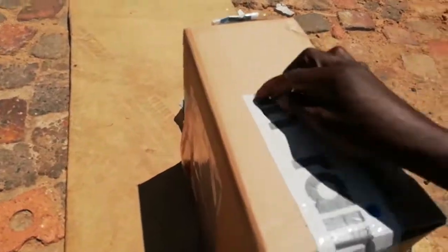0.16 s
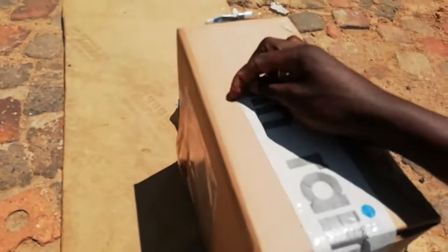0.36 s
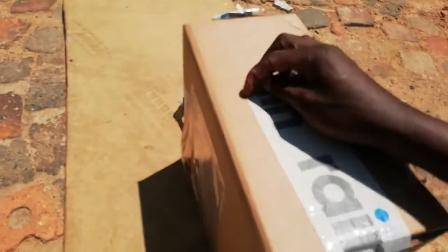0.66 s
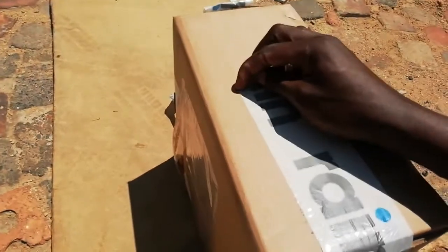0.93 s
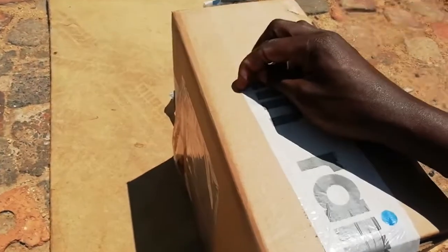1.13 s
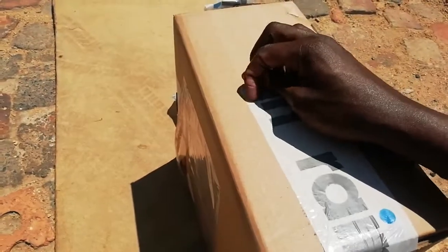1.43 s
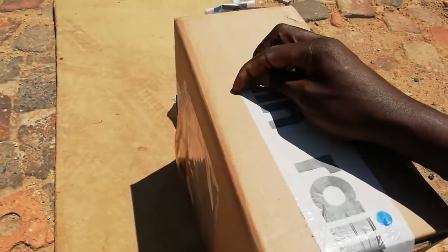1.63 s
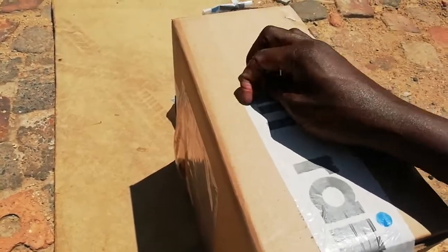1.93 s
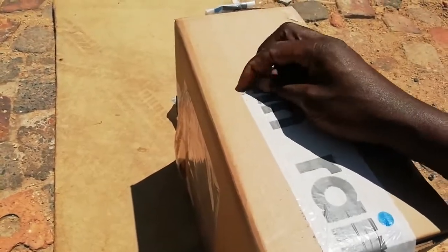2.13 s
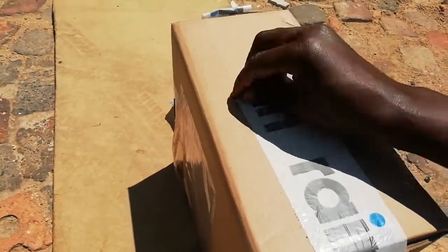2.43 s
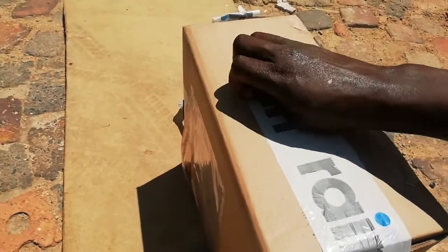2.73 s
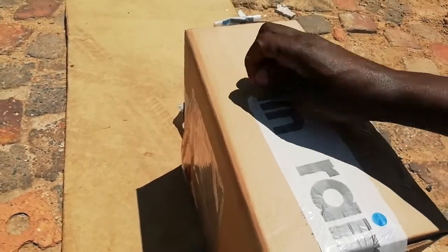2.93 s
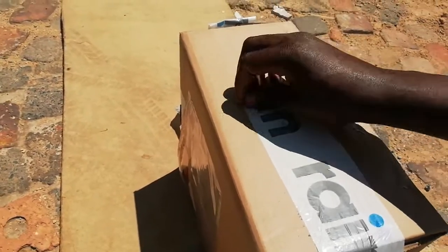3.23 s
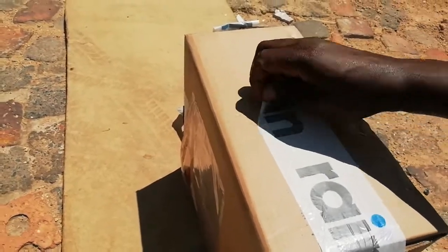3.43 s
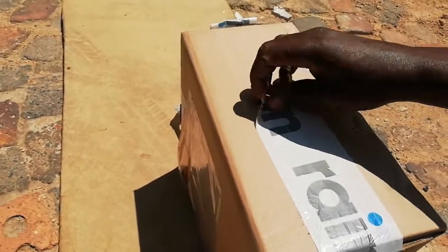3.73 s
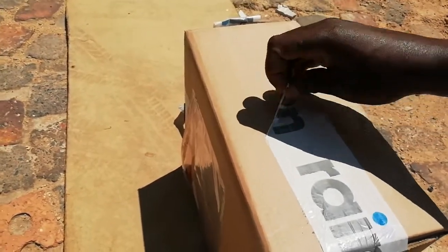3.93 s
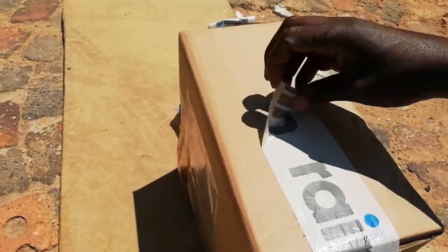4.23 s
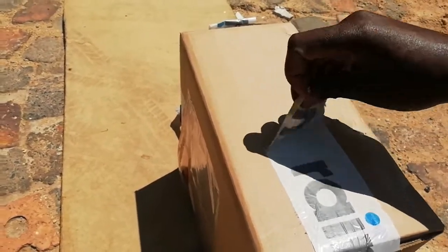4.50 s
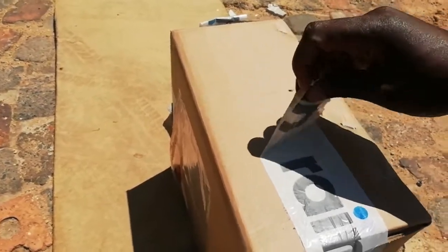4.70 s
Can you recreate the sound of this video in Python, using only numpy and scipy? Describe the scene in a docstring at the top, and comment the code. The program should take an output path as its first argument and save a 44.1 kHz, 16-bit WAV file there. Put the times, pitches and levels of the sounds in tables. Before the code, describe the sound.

Fingernails pick and flick at sealing tape on a cardboard box, then peel it in growing harsh rasps, with low hum and wind buffeting outdoors.

```python
"""Tape peeled off a box outdoors

Fingernails pick at sealing tape on a cardboard box, then peel it in short rasps, close to a phone.
Glue slips, snaps and nail flicks are noise bursts through the colours of tape film and box wall.
An engine hums (wavering sine) and a far horn toots once with an echo (overtones).
Light wind buffets the microphone ports (low noise and puffs) over a faint yard (noise)."""
import sys
import numpy as np
from scipy import signal
from scipy.fft import rfft, irfft, next_fast_len
from scipy.io import wavfile
from scipy.ndimage import uniform_filter1d, map_coordinates

SR = 44100
rng = np.random.default_rng(int(sys.argv[2]) if len(sys.argv) > 2 else 0)


def wrap_up_sound(samples):
    """Save the sound to the file named by the first command line argument, as 16-bit audio."""
    columns = np.atleast_2d(samples).T
    # keep every value between -1 and 1, then stretch to whole-number steps
    tamed = np.clip(columns, -1, 1)
    steps = np.round(tamed * 32767).astype(np.int16)
    wavfile.write(sys.argv[1], SR, steps)


N = 214326

# Colour of the tape film: (frequency [Hz], relative density [dB])
FILM_COLOUR = [(1290, -53), (2200, -22), (2950, -10.5), (3860, -8.5), (4530, -7.5), (4880, -8.5), (8640, 4),
               (10800, -9), (14400, -18.5), (15600, -26), (16400, -71)]
# Colour of the box wall: (frequency [Hz], relative density [dB])
WALL_COLOUR = [(94, -18), (160, -15), (235, -0.5), (358, -9.5), (393, -11.5), (564, -13.5), (1010, -5),
               (1730, -4), (2060, -6), (2600, -11), (3380, -7), (5720, -120)]
# Near sounds at the two ports: (frequency [Hz], left-right likeness [-1 to 1])
NEAR_ALIKE = [(60, 0.6), (180, 1), (550, 0.46), (1650, 0.62), (4970, 0.015), (15000, 0.018)]
# Near sounds at the two ports: (frequency [Hz], left over right [dB])
NEAR_LEAN = [(60, 2), (150, 4), (380, -4), (950, 3.5), (2380, -2.5), (5980, -0.5), (15000, 9.5)]


def amp(db):
    """Gain of a level in dB."""
    return 10 ** (np.asarray(db) / 20)


def unit(x):
    """x at rms 1."""
    return x / np.sqrt(np.mean(x ** 2) + 1e-20)


def along(points, hz):
    """(Hz, value) points interpolated on a log axis."""
    f, v = np.transpose(points)
    return np.interp(np.log(hz + 1), np.log(f + 1), v)


def curves(rows):
    """One value per sample for each column after the time."""
    s, *cols = np.transpose(rows)
    return [np.interp(np.arange(N) / SR, s, c) for c in cols]


def wobble(knots_per_s):
    """A smooth random curve through normal random knots."""
    knots = rng.standard_normal(int(N * knots_per_s / SR) + 4)
    return map_coordinates(knots, [np.arange(N) * knots_per_s / SR])


def held(start_s, length_s, rise_db_per_s, fall_db_per_s):
    """Attack, hold and release in dB under full level."""
    t = np.arange(N) / SR
    rise_db = -rise_db_per_s * np.maximum(start_s - t, 0)
    fall_db = -fall_db_per_s * np.maximum(t - start_s - length_s, 0)
    return rise_db + fall_db


def coloured(pair, spectrum, alike, lean=((100, 0), (1000, 0))):
    """Two unrelated drives through a causal colour of mean power gain 1, mixed to left and right."""
    # Part of the port difference that is only a phase shift: (frequency [Hz], share [0-1])
    shifted = [(300, 0.7), (1500, 0), (5000, 0.33)]
    m = 2 * next_fast_len(N // 2 + 4096)
    hz = np.fft.rfftfreq(m, 1 / SR)
    gain = unit(amp(np.maximum(along(spectrum, hz), -80)))

    # minimum phase: fold the cepstrum onto positive time
    cepstrum = irfft(np.log(gain), m)
    cepstrum[1:m // 2] *= 2
    cepstrum[m // 2 + 1:] = 0
    a, b = rfft(pair, m) * np.exp(rfft(cepstrum))

    turn = np.arccos(np.clip(along(alike, hz), -1, 1)) / 2
    share = np.clip(along(shifted, hz), 0, 1)
    mid = a * np.cos(turn)
    side = (1j * share * a + np.sqrt(1 - share ** 2) * b) * np.sin(turn)
    tilt = amp(along(lean, hz) / 2)
    return irfft(np.array([(mid + side) * tilt, (mid - side) / tilt]), m)[:, :N]


def bursts(times_s, levels_db, shapes):
    """Two unrelated noise drives under one short shape per event, each with the energy of its shape."""
    drive = np.zeros((2, N + SR))
    for s, db, shape in zip(times_s, levels_db, shapes):
        burst = shape * rng.standard_normal((2, len(shape)))
        burst *= np.linalg.norm(shape) / np.linalg.norm(burst, axis=1, keepdims=True)
        drive[:, round(s * SR):][:, :len(shape)] += amp(db) * burst
    return drive[:, :N]


def panned(pair, times_s, pan_db):
    """Each event leans to its own side; the lean glides between events."""
    return pair * amp(np.interp(np.arange(N) / SR, times_s, pan_db) * [[.5], [-.5]])


def rubbing():
    """Slips shake the film, which hisses, and the box wall, which answers lower."""
    film, wall = np.sqrt(contact())
    grain = slips(per_s=2200, spread_db=2.6, life_s=.0002, steady=1.4) * amp(1.1 * wobble(90))
    shake = bending(grain * rng.standard_normal((2, N)), patchy_db=2.4)
    knock = bending(grain * rng.standard_normal((2, N)), patchy_db=2.3, flap_db=7)
    hiss = coloured(amp(0.07) * film * shake, FILM_COLOUR, NEAR_ALIKE, NEAR_LEAN)
    answer = coloured(amp(-5.5) * wall * knock, WALL_COLOUR, NEAR_ALIKE, NEAR_LEAN)
    return hiss + answer


def contact():
    """Power that fingertip rubs and tape pulls put into film and box wall, before their trims."""
    # Fingertip on tape or box: (start [s], length [s], film level [dB], wall over film [dB])
    rubs = [(0, 0.21, -43.5, -6), (0.226, 0.073, -47.5, 0.5), (0.325, 0.0039, -33, -0.5),
            (0.342, 0.045, -52, 0), (0.465, 0.071, -56, 0.5), (0.632, 0.0032, -45, 4),
            (0.804, 0.015, -45, -1), (1.291, 0.15, -54.5, -5.5), (1.509, 0.069, -60, -2),
            (1.585, 0.0039, -42, -8), (1.647, 0.026, -54.5, -4.5), (1.722, 0.0021, -45, 1.5),
            (1.913, 0.11, -59, -6), (2.108, .015, -55.5, -3.5), (2.19, 0.042, -55.5, -14),
            (2.249, 0.04, -48.5, -7), (2.445, 0.07, -56, -22), (2.567, 0.05, -57.5, -23),
            (2.698, 0.004, -57.5, -14), (3.166, 0.16, -62, 5), (3.207, .002, -39.5, -11),
            (3.286, 0.0093, -53, -17), (3.7, 0.022, -44.5, -7), (3.766, 0.034, -49.5, -6.5),
            (3.818, 0.0041, -35.5, -9), (4.172, 0.34, -51.5, -6.5), (4.208, 0.017, -38, -12),
            (4.685, 0.023, -49.5, -8)]
    # Pulls on the tape, one curve each: (time [s], film level [dB])
    pulls = [
        [(2.33, -56), (2.342, -49.5), (2.366, -37), (2.384, -35.5), (2.41, -40), (2.43, -58)],
        [(2.785, -62), (2.813, -40.5), (2.847, -35), (2.857, -41), (2.919, -26), (2.935, -39), (2.953, -40),
         (2.959, -46), (2.995, -63)],
        [(3.335, -48), (3.366, -33.5), (3.371, -24), (3.385, -21), (3.406, -25), (3.442, -29.5), (3.448, -25),
         (3.472, -24), (3.531, -31), (3.577, -41.5), (3.603, -42.5), (3.63, -68)],
        [(3.85, -45), (3.87, -29), (3.9, -22.5), (3.948, -18), (3.96, -22), (4.062, -19.5), (4.122, -48),
         (4.14, -53)],
        [(4.383, -31), (4.39, -29.5), (4.42, -35.5), (4.458, -22.5), (4.584, -17.5), (4.622, -23),
         (4.67, -50.5)],
        [(4.822, -43), (4.836, -25), (4.844, -33), (4.86, -19.5)],
    ]
    rise_db_per_s, fall_db_per_s = 1104, 613  # the finger speeds up and slows down
    tug_db, tug_db_per_s = -20, 3  # wall over film as the first pull starts; a longer strip tugs harder
    tension_db, tension_s = 7, 0.13  # within a pull the wall gains as the strip tightens

    t, film, wall = np.arange(N) / SR, np.zeros(N), np.zeros(N)
    for start, length, db, wall_db in rubs:
        level_db = db + held(start, length, rise_db_per_s, fall_db_per_s)
        film += amp(2 * level_db)
        wall += amp(2 * (level_db + wall_db))
    for pull in pulls:
        start, end = pull[0][0], pull[-1][0]
        level_db = curves(pull)[0] + held(start, end - start, rise_db_per_s, fall_db_per_s)
        tight = 1 - np.exp(-np.maximum(t - start, 0) / tension_s)
        wall_db = tug_db + tug_db_per_s * (start - pulls[0][0][0]) + tension_db * tight
        film += amp(2 * level_db)
        wall += amp(2 * (level_db + wall_db))
    return film, wall


def slips(per_s, spread_db, life_s, steady):
    """Loudness of glue letting go: short slips of uneven size over a steady share."""
    when = rng.random(N) < per_s / SR
    size = amp(spread_db * np.minimum(rng.exponential(size=N), 4))
    fade = np.exp(-np.arange(200) / (life_s * SR))
    return unit(steady + unit(signal.fftconvolve(when * size, fade)[:N]))


def bending(pair, patchy_db, flap_db=0):
    """Resonances shift as the tape bends: random patches of gain and the moving peak of the loose end."""
    # Resonance of the loose tape end: (time [s], frequency [Hz])
    flap = [(0, 1800), (.3, 1410), (2.3, 1680), (2.9, 1370), (3.4, 1330), (3.55, 1570), (3.8, 1450),
            (4.05, 1040), (4.3, 1350), (4.47, 1540), (4.62, 1610), (4.86, 1220)]
    hz, t, z = signal.stft(pair, SR, nperseg=256)
    field = rng.standard_normal(z.shape[1:])
    field = uniform_filter1d(field, size=3, axis=0)  # over frequency
    field = uniform_filter1d(field, size=12, axis=1)  # over time
    octaves = np.log2((hz[:, None] + 1) / np.interp(t, *np.transpose(flap)))
    gain = amp(patchy_db * unit(field) + flap_db * np.exp(-(octaves / 0.22) ** 2))
    return signal.istft(z * gain, SR, nperseg=256)[1][:, :N]


def flicks():
    """A nail skids off the tape edge for a few ms and knocks the box."""
    # Flicks: (time [s], level before trim [dB], half length [s], left over right [dB])
    nail_flicks = [(0.318, -32.5, 0.0072, 0), (0.883, -33, 0.0026, 7), (0.892, -27.5, 0.00067, 0),
                   (0.925, -27.5, 0.0017, 4.5), (1.029, -28, 0.00099, 6), (1.076, -21, 0.0019, 3.5),
                   (1.362, -16, 0.002, 1.5), (1.917, -25, 0.0028, -1.5)]
    # The box under a nail: (frequency [Hz], relative density [dB])
    nail_colour = [(90, -22), (250, 2.5), (600, -14.5), (1400, 3.5), (2200, -15), (3100, -5), (4100, -16),
                   (4800, -11.5), (6000, -17), (8100, -6.5), (9200, -14), (10200, -16.5), (13000, -29),
                   (16400, -72)]
    lead_s, peak_s = .006, .002  # the shape starts before and peaks after the listed time
    s, db, half_s, pan_db = np.transpose(nail_flicks)
    t = np.arange(SR // 20) / SR - lead_s
    skid = np.exp(-((t - peak_s) / np.maximum(half_s, 2e-4)[:, None]) ** 2)
    knock = np.exp(-np.abs(t - peak_s) / np.where(t < peak_s, .003, .008))
    drive = bursts(s - lead_s, db - 5, skid + amp(-12.5) * knock)
    return panned(coloured(drive, nail_colour, NEAR_ALIKE), s, pan_db)


def snaps():
    """A patch of glue lets go at once: a sharp tick and a short rustle in film and wall."""
    # Glue snaps: (time [s], level before trim [dB], wall over film before trims [dB])
    glue_snaps = [(1.4004, -18, -17.5), (1.6915, -27, -32), (2.4595, -31, -28), (2.5434, -29.5, -29),
                  (2.902, -14.5, -35), (2.9493, -12, -22.5), (3.021, -34.5, -27), (3.1679, -27, -12),
                  (3.1777, -29.5, -8.5), (3.3548, -15.5, -24), (3.603, -23, -28), (3.691, -26, -12.5),
                  (3.706, -17, -19), (3.8185, -28, -15), (3.931, -8, -32), (4.127, -27, -30),
                  (4.172, -21.5, -30), (4.1973, -26, -13), (4.2153, -7, -17.5), (4.228, -11, -34),
                  (4.2378, -16, -20), (4.301, -18.5, -26), (4.3139, -12.5, -20), (4.3336, -15, -15),
                  (4.3723, -14, -20), (4.3881, -1, -26.5), (4.665, -22.5, -2.5), (4.7625, -21, -37),
                  (4.816, -32, -9), (4.8347, -4, -23.5)]
    s, db, wall_db = np.transpose(glue_snaps)
    t = np.arange(SR // 20) / SR
    tick, rustle = np.exp(-t / 0.00015), amp(-16.5) * np.exp(-t / 0.0033)
    shapes = [tick + rustle] * len(s)
    film = coloured(bursts(s, db - 3.5, shapes), FILM_COLOUR, NEAR_ALIKE, NEAR_LEAN)
    wall = coloured(bursts(s, db + wall_db + 3.0, shapes), WALL_COLOUR, NEAR_ALIKE, NEAR_LEAN)
    return film + wall


def squeak():
    """A thin, grainy tone that rises as the tape is drawn tight."""
    # Faint tone, before its wobbles: (time [s], frequency [Hz], level [dB])
    tone = [(3.16, 1650, -80), (3.205, 1740, -65), (3.25, 1880, -63), (3.3, 2130, -61), (3.33, 2050, -85)]
    hz, db = curves(tone)
    phase = 2 * np.pi * np.cumsum(hz + 55 * wobble(150)) / SR
    return amp(db + 3.5 * wobble(90)) * np.sin(phase)


def engine():
    """One low, slightly unsteady order of an idling engine."""
    # Hum before its wobble: (time [s], rms level [dB])
    hum = [(0, -38.5), (.5, -38.5), (.62, -49), (.8, -62), (1.05, -51.5), (1.75, -46), (2.03, -38.5),
           (2.6, -44), (3.3, -54.5), (3.55, -41.5), (3.85, -34), (4.3, -42.5), (4.86, -40)]
    start_hz, creep_hz_per_s = 95, 0.78  # the idle creeps up
    db, = curves(hum)
    hz = start_hz + creep_hz_per_s * np.arange(N) / SR + 1.467 * wobble(11)
    level = np.sqrt(2) * amp(db + 0.88 * wobble(22.28))
    return level * np.sin(2 * np.pi * np.cumsum(hz) / SR)


def horn():
    """A steady buzzy note and its duller echo; over the distance each overtone wavers on its own."""
    # Overtones: (multiple of the pitch, relative level [dB])
    orders = [(1, -17), (2, -1), (3, 0), (4, -7), (5, -5.5), (6, -12), (7, -12), (8, -19), (9, -28)]
    pitch_hz, level_db = 486, -55.5
    start_s, hold_s, rise_db_per_s, fall_db_per_s = .485, .125, 500, 350
    # off a far wall; the dull loss is per overtone above the third
    echo_s, echo_db, echo_dull_db = .2, -9.5, -6

    blast = amp(held(start_s, hold_s, rise_db_per_s, fall_db_per_s))
    echo = amp(held(start_s + echo_s, hold_s, rise_db_per_s, fall_db_per_s))
    phase = 2 * np.pi * np.cumsum(pitch_hz + 2.5 * wobble(30.6)) / SR
    note = np.zeros(N)
    for k, db in orders:
        waver = amp(level_db + db + 1.5 * wobble(18) + 2.5 * wobble(90))
        envelope = blast + echo * amp(echo_db + echo_dull_db * max(k - 3, 0))
        note += waver * envelope * np.sin(k * phase + rng.uniform(0, 2 * np.pi))
    return note


def wind():
    """Lumpy low buffeting that sweeps over the right port first."""
    # Deep rumble: (time [s], level [dB])
    deep = [(0.0, -43.5), (0.82, -49), (1.07, -37.5), (1.18, -57), (1.27, -44), (1.85, -37), (2.0, -34),
            (2.46, -50), (3.04, -33), (3.13, -46.5), (4.86, -56)]
    # Flutter before trim: (time [s], level [dB])
    gusts = [(0, -47.5), (.84, -55), (1.07, -47.5), (1.22, -62.5), (1.28, -40), (1.4, -41.5), (1.5, -57),
             (1.56, -41.5), (1.69, -46.5), (2.06, -43), (2.13, -52.5), (2.61, -54), (2.65, -44.5),
             (2.8, -48), (2.98, -33.5), (3.1, -52), (4.86, -54.5)]
    # Colour of the rumble: (frequency [Hz], relative density [dB])
    rumble_colour = [(15, -43), (25, 4), (60, 10), (85, 1), (130, -53)]
    # Colour of the flutter: (frequency [Hz], relative density [dB])
    flutter_colour = [(60, -32), (100, 7.5), (150, -2), (250, -11.5), (400, -22), (700, -52.5)]
    left_lag_s = 0.00092
    (rumble_db,), (flutter_db,) = curves(deep), curves(gusts)
    rumble = coloured(rng.standard_normal((2, N)), rumble_colour, [(30, .99), (100, .98)])
    lumpy = rng.standard_normal((2, N)) * amp(3.7 * wobble(25.193))
    flutter = coloured(lumpy, flutter_colour, [(100, 0.51), (400, 0.8)])
    left, right = amp(rumble_db) * unit(rumble) + amp(flutter_db + 3.5) * unit(flutter) + thumps()
    return np.array([np.interp(np.arange(N) - left_lag_s * SR, np.arange(N), left), right])


def thumps():
    """Single puffs thump the ports: each is about a cycle of pressure under a bell."""
    # Puffs: (time [s], peak of the bell [dB], pitch [Hz])
    puffs = [(1.284, -24, 135), (1.303, -21, 108), (1.442, -27.5, 98), (1.602, -24.5, 149),
             (1.634, -20, 120), (1.989, -25.5, 85), (2.653, -26, 115), (2.69, -26.5, 99), (2.736, -29, 128),
             (2.923, -23.5, 122), (2.95, -26, 110), (2.983, -22.5, 199), (3.009, -21.5, 75.4),
             (3.045, -26, 60.5)]
    half_width_cycles = 0.46
    pressure = np.zeros(N)
    for s, db, hz in puffs:
        cycles = hz * (np.arange(N) / SR - s)
        bell = amp(db) * np.exp(-(cycles / half_width_cycles) ** 2)
        pressure += bell * np.sin(2 * np.pi * (cycles + rng.random()))
    return pressure


def yard():
    """Far traffic and air as coloured noise, drifting a little."""
    # Colour: (frequency [Hz], relative density [dB])
    yard_colour = [(100, -12.5), (160, -13.5), (280, -10.5), (570, -25), (1100, -22), (2000, -29),
                   (4000, -33), (6000, -37), (8500, -29.5), (11000, -44), (16400, -52.5)]
    # Two ports: (frequency [Hz], left-right likeness [-1 to 1])
    yard_alike = [(150, 0.91), (1000, 0.026), (4000, 0.029), (15000, 0.064)]
    drift_db = 1.3 * wobble(4)
    return amp(-58.0 + drift_db) * coloured(rng.standard_normal((2, N)), yard_colour, yard_alike)


def scene():
    """All sources at the two microphone ports."""
    near = rubbing() + flicks() + snaps() + squeak()
    horn_pair = horn() * amp([[.7], [-.7]])  # leans left
    return near + engine() + horn_pair + wind() + yard()


def record(dry):
    """The phone rounds off the tallest peaks and keeps nothing above its band limit."""
    top_hz = 16500
    soft = dry / (1 + np.abs(dry / .9) ** 4) ** .25
    m = next_fast_len(N + SR // 2)
    return irfft(rfft(soft, m) * (np.fft.rfftfreq(m, 1 / SR) < top_hz), m)[:, :N]


dry = scene()
out = record(dry)
wrap_up_sound(out)
```